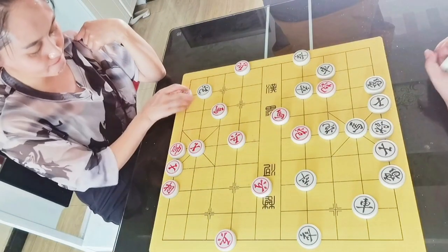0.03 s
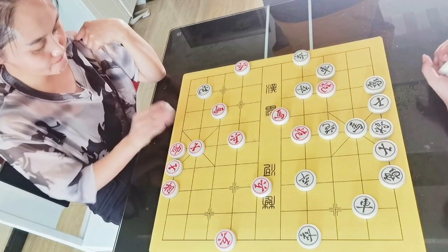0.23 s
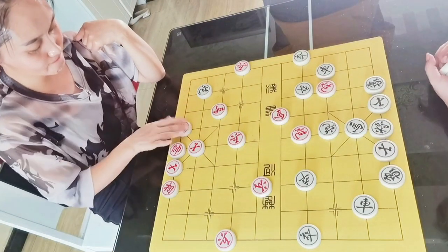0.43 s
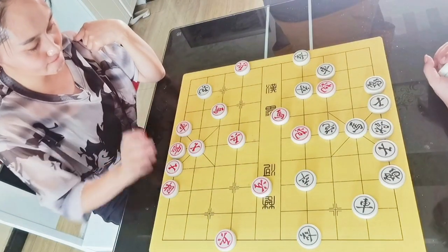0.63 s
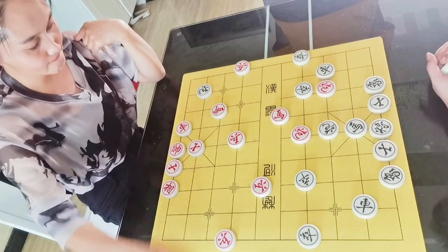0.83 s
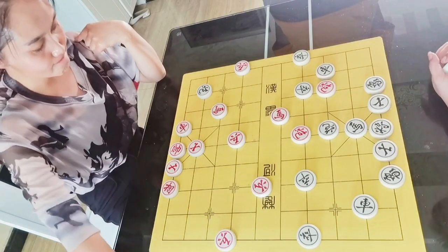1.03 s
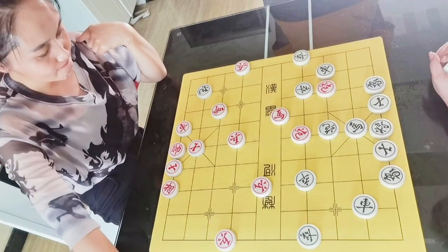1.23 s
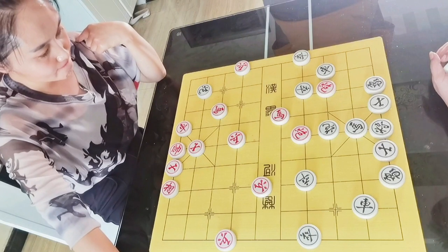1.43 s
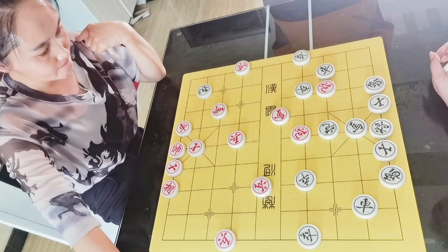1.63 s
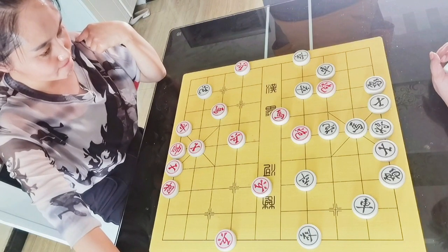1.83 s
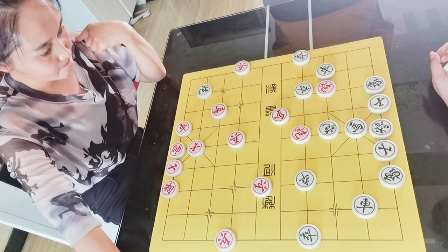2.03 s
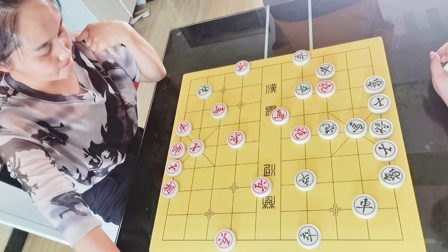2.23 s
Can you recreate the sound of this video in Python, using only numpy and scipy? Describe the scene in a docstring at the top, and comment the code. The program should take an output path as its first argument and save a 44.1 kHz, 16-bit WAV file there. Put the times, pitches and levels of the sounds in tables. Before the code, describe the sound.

After a few faint clicks, a game piece cracks down hard on a board close to the microphone, thumping the table and echoing in the room. Then come a soft knock, a light click and one more dull knock.

```python
"""Faint two-part clicks over a low room rumble, then the loud slap of a thick game piece on a board.
The piece lands on its edge, then flat; its crack and the table's thump set the bare room ringing.
The recorder's limiter holds the first tenth of a second of the slap flat.
Two dull knocks on the furniture, more clicks and a few thin squeaks follow."""
import sys
import numpy as np
from scipy import signal
from scipy.fft import rfft, irfft
from scipy.io import wavfile
from scipy.ndimage import uniform_filter1d, minimum_filter1d

SR = 44100
rng = np.random.default_rng(int(sys.argv[2]) if len(sys.argv) > 2 else 0)


def dump(signal):
    """Clip the signal to [-1, 1] and save it as 16-bit WAV at the path in sys.argv[1]."""
    limited = np.clip(np.atleast_2d(signal).T, -1, 1)
    pcm = np.round(limited * 32767).astype(np.int16)
    wavfile.write(sys.argv[1], SR, pcm)


N = 100900
T = np.arange(N) / SR


def from_db(db):
    """Decibels to gain."""
    return 10 ** (np.asarray(db) / 20)


def per_bin(points):
    """Interpolate (f/Hz, value) rows onto the FFT bins, in log frequency."""
    hz, value = np.transpose(points)
    return np.interp(np.log(np.fft.rfftfreq(N, 1 / SR) + 1e-3), np.log(hz), value)


def noise(spectrum):
    """Coloured noise, rms 1; spectrum levels are relative."""
    x = irfft(rfft(rng.standard_normal(N)) * from_db(per_bin(spectrum)), N)
    return x / x.std()


def fade(t60_s):
    """Exponential decay."""
    return np.exp(-np.log(1000) * T / t60_s)


def steepen(db_per_s2=33):
    """Extra loss on top of t60: the tail fades ever faster, as under a recorder's noise suppressor."""
    return from_db(-db_per_s2 * T ** 2)


def at(start_s, x):
    """Delay x to start_s."""
    return np.concatenate([np.zeros(int(start_s * SR)), x])[:N]


def ring(modes):
    """Struck modes as decaying sines."""
    return sum(from_db(db) * fade(t60_s) * np.sin(2 * np.pi * hz * T) for hz, db, t60_s in modes)


def echo(spectrum, t60_scale=1, build_s=0.014, bands=12):
    """Dense room reflections build up, then each band dies at its own rate."""
    # room decay: f/Hz, t60/s
    room_t60 = [(100, 0.78), (500, 0.61), (2200, 0.66), (4000, 0.62), (6500, .5), (9500, 0.38),
                (12000, 0.29), (15000, .3)]
    bins = rfft(noise(spectrum))
    bin_t60_s = t60_scale * per_bin(room_t60)
    steps_s = np.geomspace(bin_t60_s.min(), bin_t60_s.max(), bands)
    tail = sum(irfft(bins * np.interp(bin_t60_s, steps_s, share), N) * fade(t60_s)
               for t60_s, share in zip(steps_s, np.eye(bands)))
    return tail * (1 - np.exp(-T / build_s)) * steepen()


def blow(spectrum, t60_s, echo_db, echo_scale):
    """A short burst of crowded modes plus its echo."""
    return noise(spectrum) * fade(t60_s) + from_db(echo_db) * echo(spectrum, echo_scale)


def rumble():
    """Low room rumble with a little hiss, easing off."""
    # rumble spectrum: f/Hz, level/dB
    spectrum = [(25, -11), (62, 2.5), (100, -3), (180, -9.5), (350, -11), (600, -19), (1100, -27.5),
                (1700, -32), (2500, -31), (4200, -35.5), (7000, -46), (9500, -41), (15000, -45.5)]
    # rumble envelope: t/s, level/dB
    envelope = [(0, -51.5), (0.42, -50.5), (0.9, -57), (1.5, -55), (2.29, -56.5)]
    return from_db(np.interp(T, *np.transpose(envelope))) * noise(spectrum)


def clicks(ring_db=-6.5):
    """Small hard clicks: a hollow, ringing body and a bright snap."""
    # clicks: t/s, body level/dB, snap level/dB, echo t60/room t60
    hits = [(0.001, -62, -63.5, .7), (0.076, -48, -63, .7), (0.091, -49.5, -49, .7),
            (0.153, -46, -38.5, .55), (0.176, -52, -43.5, .55), (0.343, -71.5, -62, .4),
            (1.318, -46, -55, .8), (1.333, -58.5, -40, .95)]
    # body spectrum: f/Hz, level/dB
    body_spectrum = [(600, -21), (1250, -9), (1550, 3.5), (1780, -5.5), (2080, -1.5), (2400, -2),
                     (2850, -4.5), (3500, -9), (4300, -2), (4950, -13.5), (5600, -8.5), (8000, -18),
                     (15000, -28)]
    # snap spectrum: f/Hz, level/dB
    snap_spectrum = [(5000, -32), (8200, -23), (9100, -2.5), (10100, -0.5), (10900, -8.5), (12300, -10.5),
                     (15500, -26)]
    # hollow ring: f/Hz, level/dB, t60/s
    modes = [(1520, -8.5, .4), (1596, -5.5, .35), (2110, -6.5, .3), (4200, -7.5, 0.22), (5528, -13, 0.27)]
    out = 0
    for start_s, body_db, snap_db, echo_scale in hits:
        decay = dict(t60_s=0.019, echo_db=-3.5, echo_scale=echo_scale)
        body = blow(body_spectrum, **decay) + from_db(ring_db) * ring(modes)
        snap = blow(snap_spectrum, **decay)
        out += at(start_s, from_db(body_db) * body + from_db(snap_db) * snap)
    return out


def slap(thump_start_s=0.454, low_cut_hz=41, mid_db=-15.5, high_db=-12.5, rise_s=0.029, echo_db=3):
    """The piece cracks down, the table thumps, board and room ring on."""
    # contacts, edge first, then flat: t/s, level/dB
    contacts = [(0.4518, 2), (0.4530, 5.5), (0.4536, 4.5)]
    # crack spectrum: f/Hz, level/dB
    crack_spectrum = [(100, -9), (400, -3.5), (1200, -11), (2000, -5.5), (3800, 8), (6000, -8),
                      (7800, -17.5), (9400, 5.5), (11500, -10.5), (15500, -8)]
    # spectrum of its echo: f/Hz, level/dB
    echo_spectrum = [(60, -15.5), (110, -17), (165, -24.5), (280, -17.5), (380, -9.5), (540, -4.5),
                     (740, -9.5), (1000, -9), (1300, -3), (1480, -6), (1750, -2), (2200, 2), (2390, -4),
                     (2650, -1), (3800, -1), (5600, -3.5), (6900, -8.5), (7800, -16.5), (9000, 3),
                     (9800, 1), (12000, -8), (15500, -20)]
    # table heaving under the hand: f/Hz, level/dB, t60/s
    table_modes = [(58, -1.5, .055), (81, -1.5, 0.029), (219, -3.5, 0.022)]
    # board and room tones, mid range: f/Hz, level/dB, t60/s
    mid_modes = [(495, 0, 0.52), (565, -8, 0.68), (802, -8, 0.51), (883, -8, 0.61), (964, -7, 0.56),
                 (1028, -5, 0.58), (1141, -6, 0.54), (1206, -1, 0.67), (1378, -6, 0.56), (1470, -12, 0.71)]
    # board and room tones, treble: f/Hz, level/dB, t60/s
    high_modes = [(1647, -9, 0.84), (1793, 0, 0.53), (2239, -6, 0.83), (2541, -5, 0.65), (2767, 0, 0.5),
                  (2864, -5, 0.69), (3112, -5, 0.47), (3461, -2, 0.57), (3806, -2, 0.6), (3844, -9, 0.8),
                  (3898, -4, 0.6), (4371, -1, 0.44), (4834, -4, 0.46), (5001, -4, 0.54), (5443, -1, 0.37),
                  (5593, -3, 0.47), (5809, -10, 0.54), (5959, -10, 0.51)]
    # low room booms and long rings: f/Hz, level/dB, t60/s
    slow_modes = [(127.2, -23, 0.62), (351, -26, .75), (2145, -45.5, 1.26), (2160, -45.5, 1.5),
                  (2740, -45, 1.4)]
    crack = sum(at(start_s, from_db(db) * noise(crack_spectrum) * fade(t60_s=0.015))
                for start_s, db in contacts)
    low_cut = signal.butter(2, low_cut_hz, "high", fs=SR, output="sos")
    thump = signal.sosfilt(low_cut, ring(table_modes))
    tones = from_db(mid_db) * ring(mid_modes) + from_db(high_db) * ring(high_modes)
    tones = tones * steepen() + ring(slow_modes)
    room = tones * (1 - np.exp(-T / rise_s)) + from_db(echo_db) * echo(echo_spectrum)
    return crack + at(thump_start_s, thump) + at(contacts[0][0], room)


def knocks():
    """Dull knocks on furniture: a soft tap over a thud and a low wooden ring."""
    # knocks: t/s, thud level/dB, ring level/dB, tap level/dB, tap cutoff/Hz
    hits = [(1.126, -53, -55, -51.5, 3800), (2.191, -40.5, -37.5, -58, 9000)]
    # thud spectrum: f/Hz, level/dB
    thud_spectrum = [(50, -36), (130, -6.5), (300, 0), (500, -9), (750, -15), (1500, -20.5), (3000, -42.5)]
    # tap spectrum: f/Hz, level/dB
    tap_spectrum = [(300, 9), (1800, -5), (2800, -1), (4400, -4), (6000, -17), (7800, -39), (9300, -30),
                    (14000, -43)]
    # wooden ring: f/Hz, level/dB, t60/s
    modes = [(126.6, -8, 0.8), (293.4, 0.5, 0.32), (405, -9.5, 0.62), (520, -11.5, 0.44)]
    decay = dict(t60_s=0.069, echo_db=1, echo_scale=0.79)
    out = 0
    for start_s, thud_db, ring_db, tap_db, cutoff_hz in hits:
        lowpass = signal.butter(2, cutoff_hz, fs=SR, output="sos")
        tap = from_db(tap_db) * signal.sosfilt(lowpass, blow(tap_spectrum, **decay))
        thud = from_db(thud_db) * blow(thud_spectrum, **decay)
        out += at(start_s, tap + thud + from_db(ring_db) * ring(modes))
    return out


def squeaks(width_hz=180):
    """Thin, wavering tones: narrow-band noise that swells and fades."""
    # squeaks: peak t/s, swell half-width/s, f/Hz, level/dB
    swells = [(1.508, 0.28, 2510, -73.5), (1.773, 0.26, 2564, -73), (1.977, 0.029, 1380, -67),
              (2.02, 0.075, 2040, -71.5)]
    out = 0
    for peak_s, half_width_s, hz, db in swells:
        band = signal.butter(2, [hz - width_hz / 2, hz + width_hz / 2], "band", fs=SR, output="sos")
        tone = signal.sosfilt(band, rng.standard_normal(N))
        swell = np.exp(-2 * ((T - peak_s) / half_width_s) ** 2)
        out += from_db(db) * swell * tone / tone.std()
    return out


def scene():
    """All sources at one microphone."""
    return (rumble() + clicks() + slap() + knocks() + squeaks())[None]


def record(dry):
    """Fast look-ahead limiter, then a steep treble cut."""
    ceiling, release_db_per_s, window_s, stopband_hz = 0.94, 165, 0.0005, 16200
    window = int(window_s * SR)
    over_db = 20 * np.log10(np.maximum(np.abs(dry[0]) / ceiling, 1))
    release_db = release_db_per_s * T
    reduction_db = np.maximum.accumulate(over_db + release_db) - release_db
    # centred windows: gain drops just ahead of a peak
    gain = uniform_filter1d(minimum_filter1d(from_db(-reduction_db), window), window)
    lowpass = signal.cheby2(20, 80, stopband_hz, fs=SR, output="sos")
    return signal.sosfilt(lowpass, dry * gain)


dry = scene()
out = record(dry)
dump(out)
```